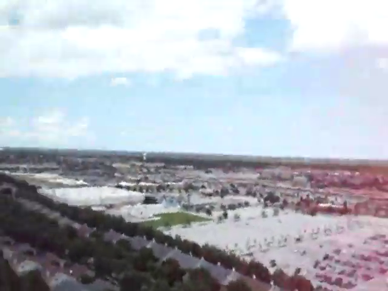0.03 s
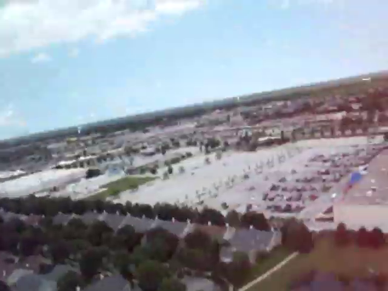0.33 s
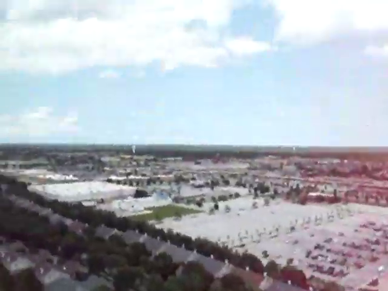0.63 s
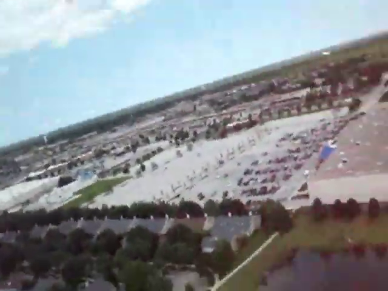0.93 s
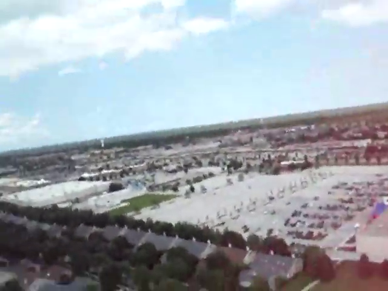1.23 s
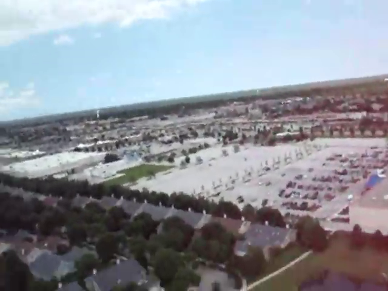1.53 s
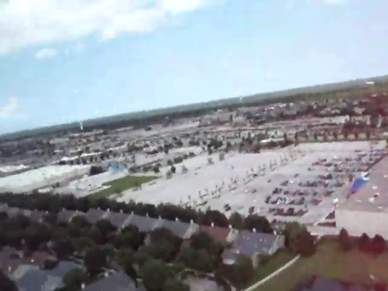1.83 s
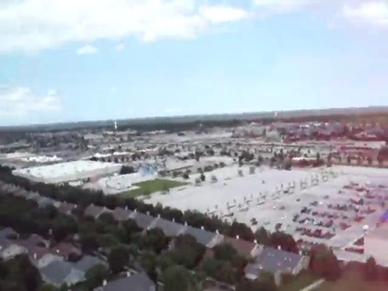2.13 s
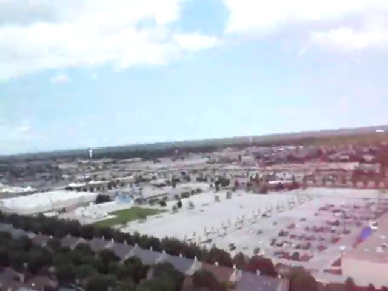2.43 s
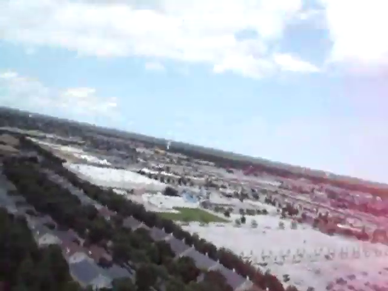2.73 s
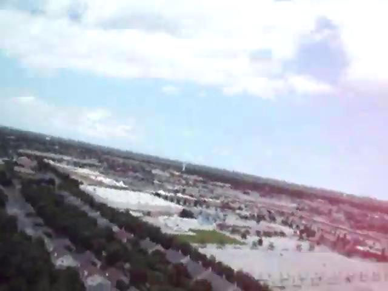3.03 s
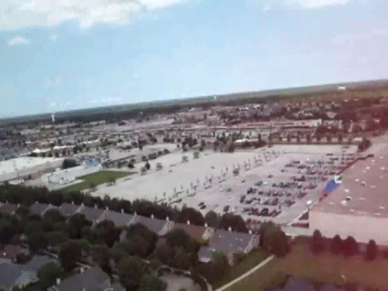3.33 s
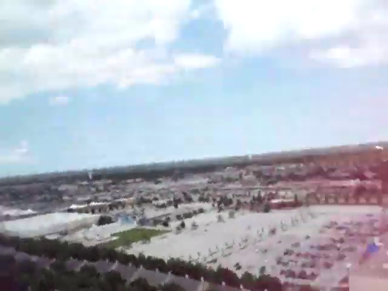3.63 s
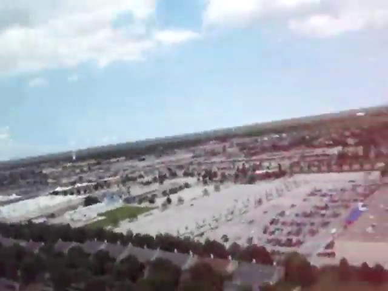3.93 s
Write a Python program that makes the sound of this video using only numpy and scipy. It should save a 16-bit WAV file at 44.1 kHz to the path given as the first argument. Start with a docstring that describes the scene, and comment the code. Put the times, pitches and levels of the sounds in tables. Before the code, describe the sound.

Wind rushes past a small model glider high in the air, rumbling on the onboard microphone. Two wavering, whistling tones sink and then climb, while steering motors whirr briefly and a few sharp knocks come in the second half.

```python
"""A small model aircraft glides high up. From the start, air sings on its body in two wavering tones,
whistles, hisses past and buffets the microphone; a limiter turns the strongest gusts down. The tones
sink as the glider slows until about 1.5 s, then climb as it speeds up. The servos (small steering
motors) whirr at the start, after 1 s, near 3 s and faintly at the end. From about 2.5 s the body
gives a few sharp knocks, the hardest just after 3 s."""
import sys
import numpy as np
from scipy.fft import rfft, irfft, next_fast_len
from scipy.io import wavfile
from scipy.ndimage import uniform_filter1d, minimum_filter1d, map_coordinates

SR = 44100
rng = np.random.default_rng(int(sys.argv[2]) if len(sys.argv) > 2 else 0)


def materialize(psi):
    """Save the field psi as 16-bit PCM at rate SR to the path in sys.argv[1].

    A 1-D psi becomes a single channel; in a 2-D psi each row is a channel.
    """
    bounded = np.clip(np.atleast_2d(psi).T, -1, 1)
    quanta = np.round(bounded * 32767).astype(np.int16)
    wavfile.write(sys.argv[1], SR, quanta)


N = 176400
T = np.arange(N) / SR

# tone colour of the rushing air and of the crack in a knock (frequency [Hz], level [dB])
HISS_SPECTRUM = [(100, 4.5), (400, 4.5), (1400, 0.5), (2400, -0.5), (2900, -4), (3800, -3.5), (4800, -4),
                 (5500, -21), (6300, -20.5), (6700, -34), (7200, -77.5)]


def wind_tones():
    """Edges shed little swirls of air and sing: the faster the flight, the higher the two tones."""
    # airspeed, given as the pitch of the upper tone (time [s], pitch [Hz])
    airspeed = [(0, 1227), (.2, 1232), (.4, 1134), (.57, 1102), (.87, 965), (1.1, 1019), (1.2, 898.5),
                (1.36, 835.5), (1.54, 827), (1.76, 1010), (2.25, 1048), (2.45, 1112), (2.88, 1169),
                (3.2, 1090), (3.45, 1069), (3.7, 1069), (3.85, 1096), (4, 1165)]
    # how strong each tone is (time [s], level [dB])
    upper_levels = [(0.0, -21), (0.122, -21), (0.184, -40), (0.202, -28), (0.534, -13), (0.59, -36),
                    (0.61, -18), (0.776, -30), (0.808, -18), (0.86, -39), (1.174, -16), (1.354, -40),
                    (1.452, -16), (1.632, -23), (1.642, -40), (1.7, -20), (1.74, -20), (2.036, -35),
                    (2.046, -21), (2.11, -35), (2.12, -19), (2.15, -18.5), (2.35, -18), (2.36, -35),
                    (2.412, -17), (2.602, -15), (2.706, -31), (2.716, -17), (2.83, -23), (2.86, -12),
                    (2.88, -31), (2.916, -16), (3.536, -13), (3.576, -31), (3.586, -14.5), (4.0, -16)]
    lower_levels = [(0.0, -17), (0.15, -17), (0.18, -27), (0.31, -21), (0.39, -25), (0.82, -23),
                    (0.93, -26), (1.16, -21.5), (1.19, -26), (2.13, -22.5), (2.16, -17.5), (2.31, -23.5),
                    (2.55, -17), (2.61, -23), (2.65, -14), (2.67, -23), (2.88, -15), (3.41, -23),
                    (3.51, -15.5), (3.71, -24.5), (3.77, -18.5), (4.0, -21)]
    # the singing edges (pitch [times the upper tone], half width [Hz], level [dB])
    upper_edges = [(.975, 50, -1.5), (.87, 34, -12), (1.12, 25, -17)]
    lower_edges = [(.473, 7, -7), (.5, 8.1, -10), (.54, 16, -6), (.52, 58, -8)]
    # brief extra tones (start [s], length [s], first pitch [Hz], last pitch [Hz], level [dB])
    side_tones = [(0, 0.15, 745, 758, -23), (0, .2, 610, 600.4, -19.5), (.03, .16, 1292, 1330, -25.5),
                  (0.233, 0.14, 595, 546, -24), (0.577, 0.17, 618, 608, -24.5),
                  (0.601, 0.13, 1214, 1190, -29.5), (0.664, .22, 506, 460, -23),
                  (1.023, .13, 1025, 1045, -22.5), (1.16, .11, 1000, 1010, -23),
                  (1.127, 0.11, 478, 462.8, -25.5), (1.424, .22, 418, 443, -25.5),
                  (1.763, .16, 900, 893, -28.5), (2.147, 0.17, 519.2, 515.5, -24),
                  (2.455, .21, 1257, 1304, -22.5), (2.802, 0.13, 635, 615.9, -22),
                  (3.04, .18, 534.3, 510.4, -18.5), (3.762, .24, 505, 545.5, -21)]
    hz = curve(airspeed) * (1 + .004 * wobble(25))
    upper_db = curve(upper_levels)
    fuzzy, lower = [
        sum(amp(db) * fuzzy_tone(ratio * hz, width, steadiness=1.5) for ratio, width, db in edges)
        for edges in (upper_edges, lower_edges)]
    # the upper tone locks in and turns pure as it grows louder
    half_pure_db, blend_db, waver_db = -16, 3.5, 1.6
    purity = 1 / (1 + np.exp((half_pure_db - upper_db) / blend_db))
    upper = np.sqrt(purity) * fuzzy_tone(hz, width_hz=7, steadiness=9.6)
    upper += np.sqrt(1 - purity) * fuzzy * amp(waver_db * wobble(30))
    side = np.zeros(N)
    for start, length, first, last, db in side_tones:
        glide = curve([(start, first), (start + length, last)])
        side += amp(db) * gate(start, length, fade=.04) * fuzzy_tone(glide, width_hz=8, steadiness=4.9)
    lower_db = curve(lower_levels) + waver_db * wobble(30)
    return amp(upper_db + .5) * upper + amp(lower_db - 1.2) * lower + side


def buffeting():
    """Wind pushes on the microphone: a lumpy rumble, short thumps and slow, heavy swings of pressure."""
    # strength of the rumble (time [s], level [dB])
    rumble_levels = [(0.0, -18), (0.09, -24), (0.12, -25), (0.15, -9.5), (0.29, -12), (0.32, -15.5),
                     (0.4, -9), (0.47, -23.5), (0.49, -15.5), (0.98, -13), (1.0, -17.5), (1.48, -13.5),
                     (1.53, -17), (1.56, -12.5), (1.92, -16.5), (2.37, -16), (2.39, -11), (2.52, -27),
                     (2.65, -16), (3.25, -22.5), (3.29, -20.5), (3.49, -22), (3.51, -26.5), (3.56, -15),
                     (3.95, -18.5), (4.0, -25.5)]
    # its tone colour (frequency [Hz], level [dB])
    rumble_spectrum = [(8, -4), (22, 4), (50, -1.5), (100, -8), (200, -15.5), (330, -22.5), (700, -32.5),
                       (1500, -68.5)]
    # short wind thumps (time [s], pitch [Hz], level [dB])
    thumps = [(.207, 170, -12), (0.236, 130, -8), (.41, 130, -9), (.735, 150, -12.5), (.818, 130, -12.5),
              (.847, 150, -1), (1.033, 130, -10), (1.36, 160, -12), (1.41, 170, -10), (1.435, 160, -7),
              (1.46, 160, -6), (1.643, 120, -9.5), (1.83, 190, -10), (3.568, 150, -11), (3.617, 150, -9)]
    # heavy gusts (start [s], length [s], level [dB])
    gusts = [(0.149, 0.047, -3), (.878, .075, 3), (1.631, 0.073, -1)]
    thump_s, gust_hz = .002, 22
    lumps = amp(2 * wobble(40))
    out = amp(curve(rumble_levels) + 1) * unit(lumps * noise(rumble_spectrum))
    for time, hz, db in thumps:
        t = T - time
        out -= amp(db) * np.exp(-(t / thump_s) ** 2 / 2) * np.cos(2 * np.pi * hz * t)
    for start, length, db in gusts:
        t = T - start
        swell = np.sin(np.pi * np.clip(t / length, 0, 1))
        out += amp(db) * swell * np.sin(2 * np.pi * gust_hz * t)
    return out


def knocks():
    """A stiff part of the body rings for a few cycles, with a little crack of noise."""
    # sharp knocks (start [s], ring pitch [Hz], decay time [s], level [dB])
    hits = [(2.477, 4400, .0006, 1.5), (2.5265, 2916, .002, -3), (2.528, 4790, 0.0018, -6),
            (3.1755, 2190, .0007, 13), (3.7175, 4600, .001, -3)]
    rise_s = .00026
    out, crack = np.zeros(N), .4 * noise(HISS_SPECTRUM)
    for start, hz, decay, db in hits:
        t = np.maximum(T - start, 0)
        envelope = (1 - np.exp(-t / rise_s)) * np.exp(-t / decay)
        out += amp(db) * envelope * (np.sin(2 * np.pi * hz * t) + crack)
    return out


def servos():
    """The steering motors' gears make a rough noise that rings through the aircraft's body."""
    # motor moves (start [s], length [s], level [dB])
    moves = [(-.02, 0.13, -20.5), (1.13, .024, -22), (1.166, 0.02, -23), (1.196, 0.022, -24),
             (2.884, .145, -23), (3.035, 0.094, -29), (3.946, .07, -34.5)]
    # tone colour of the whirr (frequency [Hz], level [dB])
    whirr_spectrum = [(300, 2), (700, -2), (1500, -11), (2100, -8.5), (2500, 5.5), (2850, -2.5), (3250, 0),
                      (3700, -11), (4300, -10), (4700, 1), (5050, -1), (5580, -24), (5950, -10.5),
                      (6350, -17), (6800, -48), (7500, -75)]
    level = sum(amp(db) * gate(start, length, fade=.012) for start, length, db in moves)
    return level * unit(noise(whirr_spectrum) * amp(3.5 * wobble(170)))


def whistles():
    """Air blows over a gap in breathy, unsteady whistles above the tones."""
    # sliding whistles (start [s], length [s], first pitch [Hz], last pitch [Hz], level [dB])
    glides = [(.05, .12, 1800, 2040, -27), (.57, .13, 1542, 1750, -33), (.71, .08, 1950, 1900, -29),
              (1.408, 0.26, 1550, 1845, -28), (1.93, .17, 1600, 1407, -26), (2.074, .08, 1750, 1860, -28.5),
              (2.23, 0.13, 1567, 1486, -25.5), (2.34, .16, 1850, 1950, -25),
              (2.773, 0.11, 1910, 1970, -36.5), (3.078, .19, 1955, 1765, -32)]
    out = np.zeros(N)
    for start, length, first, last, db in glides:
        hz = curve([(start, first), (start + length, last)]) * (1 + .05 * wobble(45))
        flicker = amp(5 * wobble(80))
        out += amp(db) * gate(start, length, fade=.021) * unit(flicker * fuzzy_tone(hz, width_hz=190))
    return out


def rushing_air():
    """Passing air makes a broad hiss that flickers as the flow churns."""
    level_db, flicker_db = -27, 2.55
    return amp(level_db + flicker_db * wobble(110)) * noise(HISS_SPECTRUM)


def fuzzy_tone(hz, width_hz, steadiness=0):
    """The tone of shed swirls: narrow noise around a moving pitch. Steadiness evens out its loudness."""
    a, b = [filtered(rng.standard_normal(N), lambda f: 1 / (1 + (f / width_hz / 2) ** 2) ** 2)
            for _ in range(2)]
    drift = unit(a + 1j * b)  # random changes of strength and phase
    drift = unit(drift / (1 + steadiness * np.abs(drift)))
    phase = 2 * np.pi * np.cumsum(hz) / SR
    return unit((drift * np.exp(1j * phase)).real)


def amp(db):
    """Turn decibels into a factor to multiply by."""
    return 10 ** (np.asarray(db) / 20)


def unit(x):
    """Scale a signal to an average strength (rms) of 1."""
    return x / np.sqrt(np.mean(np.abs(x) ** 2) + 1e-20)


def curve(rows):
    """Join (time [s], value) points with straight lines."""
    return np.interp(T, *np.transpose(rows))


def wobble(rate):
    """A smooth random curve through `rate` points a second."""
    return map_coordinates(rng.standard_normal(4000), [T * rate], mode="wrap")


def filtered(x, response):
    """Multiply each frequency in x by response(frequency)."""
    size = next_fast_len(N + SR // 2)
    return irfft(rfft(x, size) * response(np.fft.rfftfreq(size, 1 / SR)), size)[:N]


def noise(spectrum):
    """Noise of strength 1, shaped by (frequency [Hz], level [dB]) points."""
    freqs, db = np.transpose(spectrum)
    white = rng.standard_normal(N)
    return unit(filtered(white, lambda hz: amp(np.interp(np.log(hz + 1), np.log(freqs), db))))


def gate(start, length, fade):
    """Fade in, stay on, fade out; all times in seconds."""
    return np.clip(np.minimum(T - start, start + length - T) / fade + .5, 0, 1)


def scene():
    """Add all the sources into one channel."""
    return (wind_tones() + whistles() + rushing_air() + buffeting() + servos() + knocks())[None]


def record(dry):
    """A limiter turns strong gusts down, the high treble is cut, and the hardest knock still clips."""
    ceiling, hold_s, release_s = .81, .0066, .0071
    low_cut_hz, high_cut_hz, after_clip_hz = 10, 6900, 12800
    x = dry[0]
    strength = np.sqrt(2 * np.abs(uniform_filter1d(x ** 2, size=96)))
    needed_gain = ceiling / np.maximum(strength, ceiling)
    held_gain = minimum_filter1d(needed_gain, int((hold_s + release_s) * SR) + 1)
    gain = uniform_filter1d(held_gain, int(release_s * SR) + 1)
    x = filtered(x * gain, lambda hz: 1j * hz / (low_cut_hz + 1j * hz) * (hz < high_cut_hz))
    return filtered(np.clip(x, -1, 1), lambda hz: hz < after_clip_hz)[None]


dry = scene()
out = record(dry)
materialize(out)
```